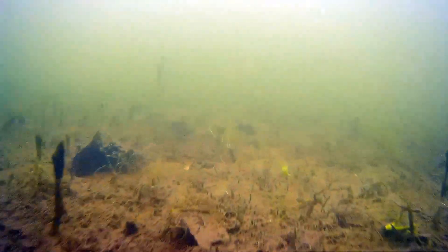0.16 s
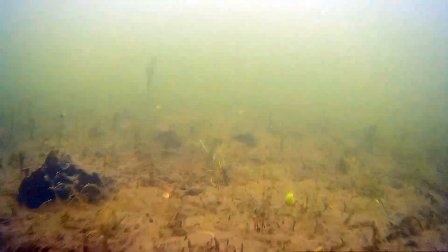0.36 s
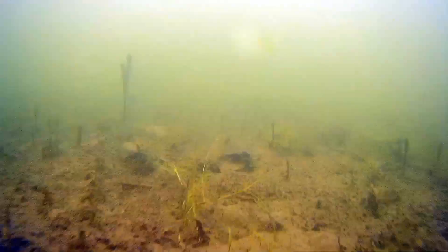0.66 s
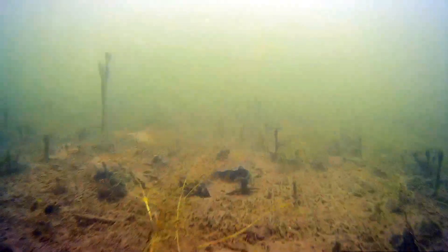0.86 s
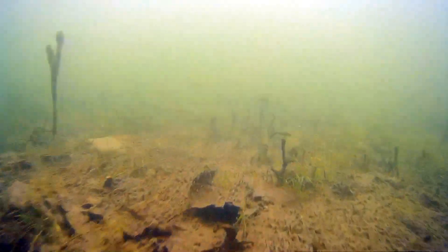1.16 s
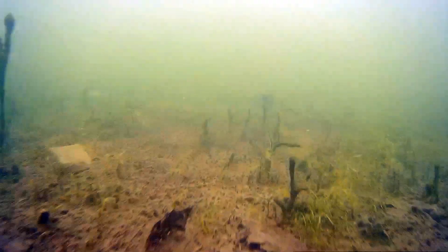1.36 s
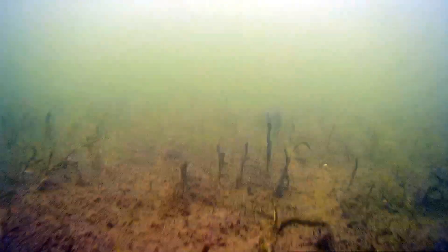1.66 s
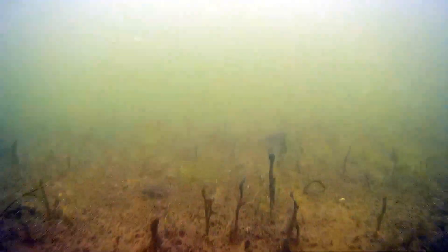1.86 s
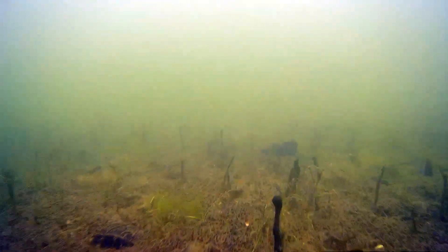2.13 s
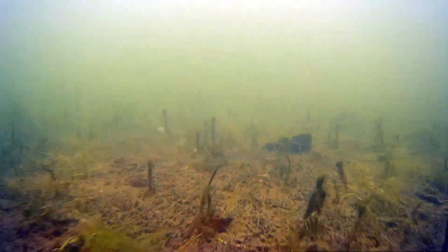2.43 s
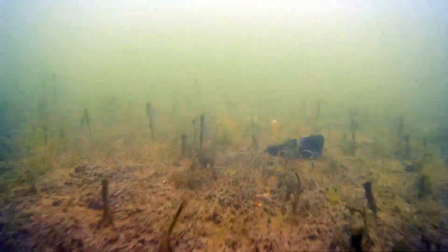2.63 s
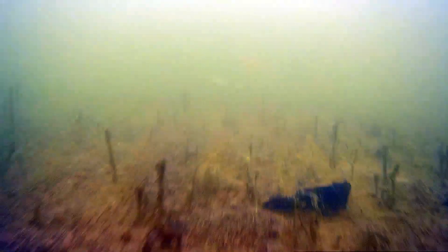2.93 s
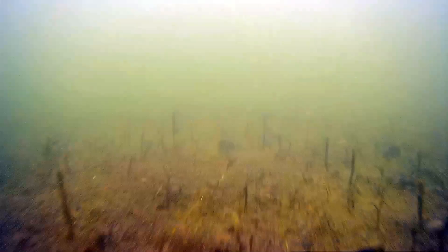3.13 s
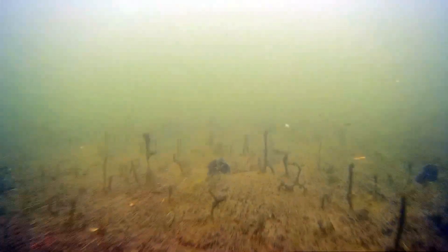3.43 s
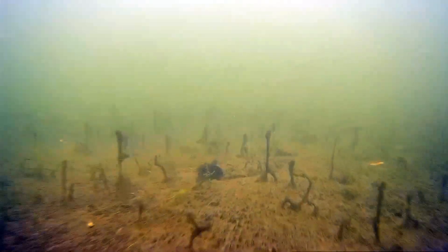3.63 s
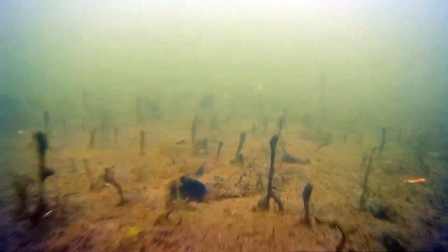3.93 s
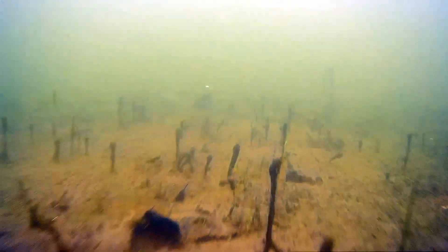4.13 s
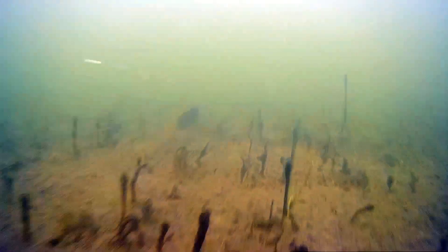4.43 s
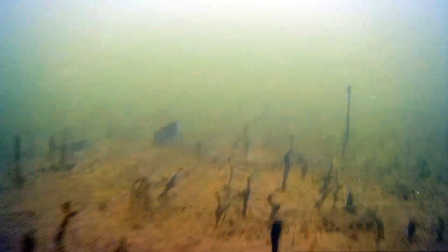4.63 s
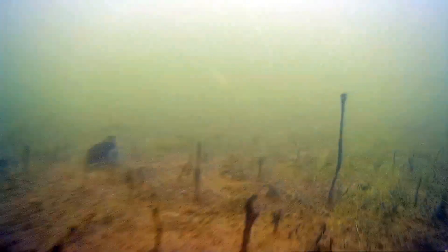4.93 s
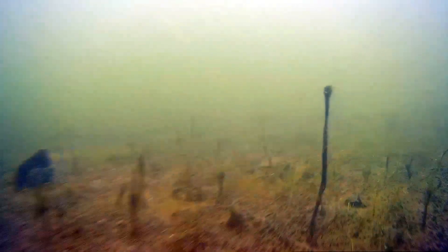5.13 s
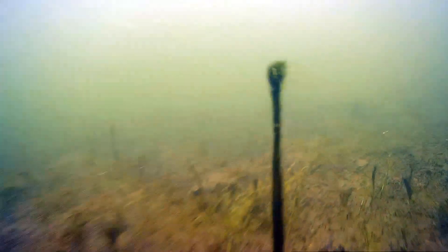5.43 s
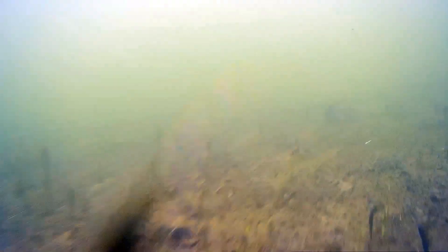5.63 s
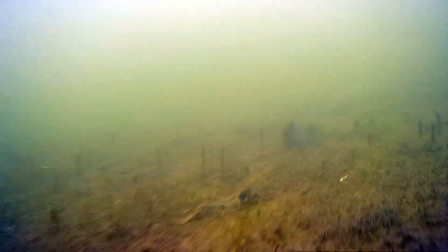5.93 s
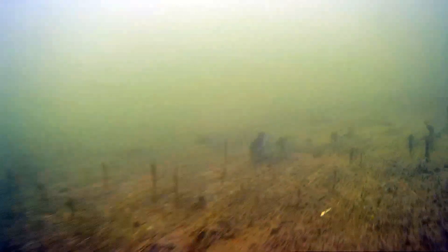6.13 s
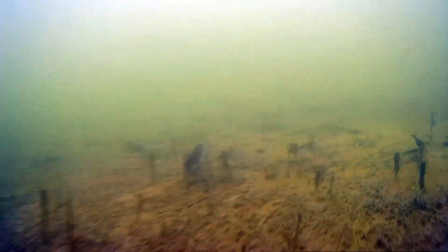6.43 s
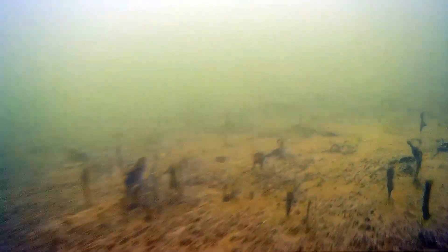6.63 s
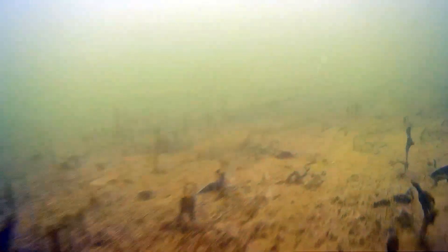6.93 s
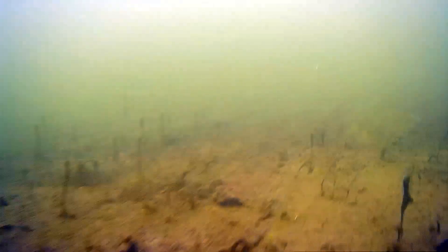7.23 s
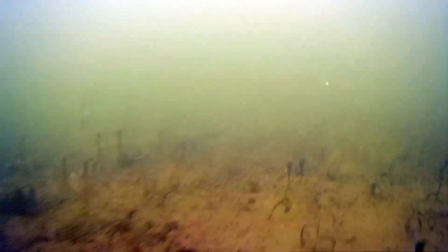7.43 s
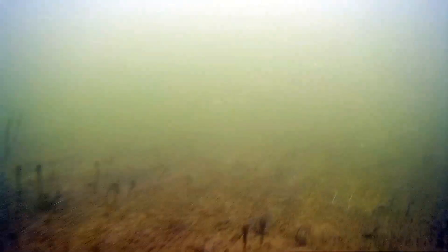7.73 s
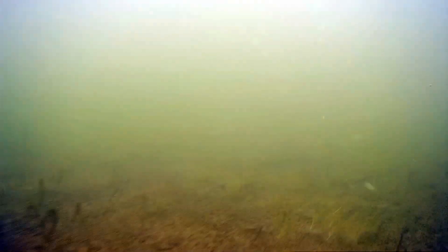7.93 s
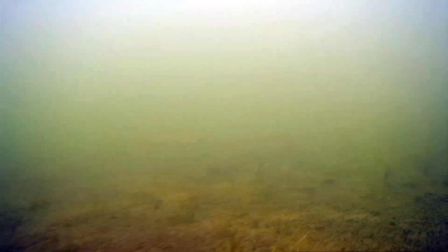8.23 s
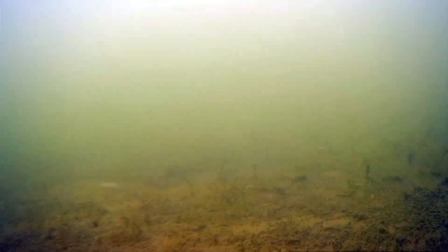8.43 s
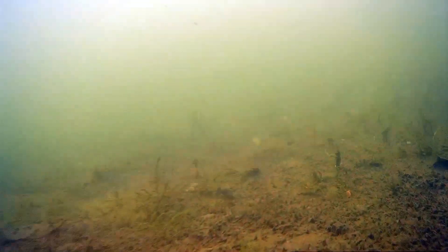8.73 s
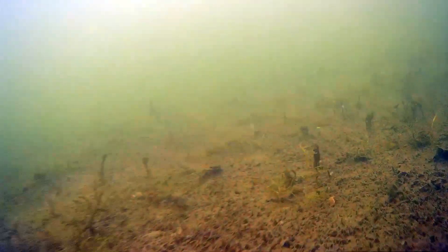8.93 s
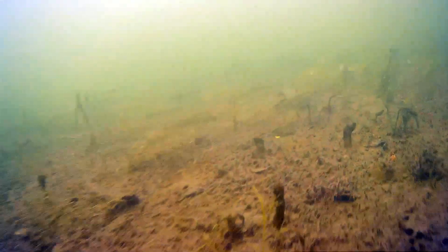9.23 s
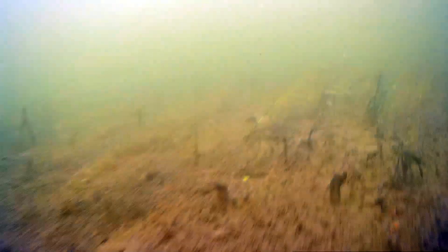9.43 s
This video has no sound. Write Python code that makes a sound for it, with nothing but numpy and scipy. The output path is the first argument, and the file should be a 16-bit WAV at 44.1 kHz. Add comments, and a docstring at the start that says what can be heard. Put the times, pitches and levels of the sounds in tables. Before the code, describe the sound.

A small electric motor hums and whines steadily underwater, heard through a hull, stepping down and up in pitch, with a few brief gritty scuffs late on.

```python
"""Model submarine under way

A model submarine cruises over a lake bed, heard through its own hull. A three-pole motor drives a three-bladed
propeller through 9:30 gears: sines locked to the shaft give hum, whine and a throb where blade and shaft tones beat.
Filtered noise gives a pulsing hiss of teeth and brushes and a low wash. The speed steps down and up in throttle
notches; at its lowest, short noise bursts scuff along the hull."""
import sys
import numpy as np
from scipy import signal
from scipy.fft import rfft, irfft, next_fast_len
from scipy.io import wavfile

SR = 44100
rng = np.random.default_rng(int(sys.argv[2]) if len(sys.argv) > 2 else 0)


def wav_record(signal):
    """Record a signal, one row per channel, as 16-bit PCM in the file named by sys.argv[1]."""
    frames = np.transpose(np.atleast_2d(signal))
    bounded = np.clip(frames, -1, 1)
    # unit amplitude maps onto the largest positive 16-bit level
    quanta = np.round(bounded * 32767).astype(np.int16)
    wavfile.write(sys.argv[1], SR, quanta)


N = 422037
TIME = np.arange(N) / SR  # s

FREE_HZ, LABOURING_HZ = 183.64, 151  # motor turns per second that set load 0 and load 1
PINION_TEETH, WHEEL_TEETH, BLADES, POLES = 9, 30, 3, 3
PROP_RATIO = PINION_TEETH / WHEEL_TEETH  # propeller turns per motor turn

# Throttle moves in equal notches: start_s, glide_s, notches_below_full after the move
THROTTLE_MOVES = [(.68, .08, 2), (1.02, .12, 1), (1.32, .09, 0), (2.04, .09, 1), (3.56, .09, 2),
                  (3.84, .22, 0), (5.59, .18, 3), (6.03, .09, 2), (6.51, .23, 3), (6.91, .21, 6),
                  (7.75, .15, 3), (7.96, .25, 1), (8.54, .08, 2), (8.89, .14, 0), (9.29, .22, 3)]
FIRST_NOTCH, NOTCH_HZ = 1, 5.27
SAG_HZ_PER_S = .103
# The scuffs brake the motor a little further
BRAKE_AT_S, BRAKE_WIDTH_S, BRAKE_HZ = 7.45, .1, 1.2

# Hull response to each leading tone at its pitch of the moment, before swells: pitch_hz, rms_level_db
BLADE_RESPONSE = [(138, -45), (150, -59), (155, -50.6), (160, -46.5), (165, -41)]
HUM_RESPONSE = [(303, -40.5), (318, -32), (334, -32.5), (356, -33.5), (366, -34)]
POLE_RESPONSE = [(455, -46.5), (501, -43), (534, -38.5), (549, -36)]
WHINE_RESPONSE = [(2720, -44), (2830, -51), (2950, -42), (3020, -48), (3100, -46.5), (3190, -39),
                  (3300, -49)]
# Slow swells added to the hum, the pole tone and the whine: time_s, change_db
HUM_SWELL = [(0, -.5), (2.4, -0.9), (5.6, -3), (6.7, 1.8), (9.57, .7)]
POLE_SWELL = [(0, -0.5), (1.2, -1.2), (2.35, 5), (2.9, -4), (3.8, 2), (4.35, -4), (5.4, 2.2), (7, -3),
              (9.57, -4.5)]
WHINE_SWELL = [(0, 0.5), (2.5, 2), (2.85, -6.5), (3.35, -0.5), (4.8, 4), (6.05, -6), (6.45, 0), (8.3, -0.5),
               (9.57, 2)]

# Lesser tones before hull and gain: multiple_of_motor_speed (before rounding to tenths), free_db, labouring_db
LESSER_PARTIALS = [(0.3, -55, -58.5), (1, -53, -52.5), (1.5, -61, -78), (1.8, -51, -56), (1.9, -55, -52.5),
                   (2.1, -61, -53.5), (2.4, -52.5, -48), (2.7, -62.5, -54), (3.3, -62.5, -56.5),
                   (3.6, -53, -52.5), (3.9, -56, -53), (4, -73, -49.5), (4.8, -53.5, -69.5), (5, -66, -54),
                   (6, -56, -52.5), (6.99, -54, -66), (8.34, -64, -70), (8.66, -60, -76),
                   (8.997, -57.5, -61), (9.6, -59, -89.5), (9.99, -56, -59.5), (12, -56.5, -51.5),
                   (15, -61, -51.5), (17.39, -51.5, -77), (17.66, -55.5, -55), (19.5, -60, -73.5),
                   (20.53, -53, -88.5), (20.96, -69.5, -46.5), (24.01, -58, -51), (27.03, -53, -63.5),
                   (29.5, -71, -67), (32.9, -62.5, -56.5), (35.92, -56, -51.5), (36.5, -60, -74.5),
                   (50.4, -78.5, -52.5), (53.9, -67.5, -44.5)]
# Hull resonances that lift a passing tone: centre_hz, width_hz, lift_db
HULL_PEAKS = [(168.3, 27.6, 14), (326, 37, 11), (1075, 63, 8.5), (1537, 86, 10.5), (4390, 150, 10),
              (5496, 110, 12), (6600, 260, 15)]
# Hull antiresonances, where little passes: centre_hz, width_hz, dip_db (negative)
HULL_DIPS = [(985, 60, -6.5), (1134, 59, -15.5), (2114, 62, -16.5), (2600, 210, -7.5), (3360, 153, -14),
             (3864, 47, -10), (4210, 71, -15), (4560, 83, -7.5), (5560, 120, -8), (5920, 245, -21.5),
             (6480, 120, -9), (8030, 310, -21.5), (8610, 160, -15)]

# Friction of teeth and brushes, before hull and rubbing: frequency_hz, density_db_per_hz
HISS_SPECTRUM = [(850, -93.5), (1230, -74), (1400, -77.5), (1560, -76), (1900, -74), (2450, -80),
                 (3050, -74), (3750, -73.5), (5400, -76), (6200, -78), (6800, -74.5), (7450, -71.5),
                 (8100, -73), (9300, -87.5)]
# How hard teeth and brushes rub: time_s, change_db
FRICTION_LEVEL = [(0, .5), (1.0, 1.5), (1.7, -1), (2.2, 1.5), (2.9, -0.6), (3.85, 1.3), (4.4, -0.45),
                  (6.4, 1.04), (9.57, 0.5)]
# Rubbing eases as the motor coasts down: memory, and dB per turn per second lost
COAST_S, COAST_DB_PER_HZ = 0.13, 0.17
# The boat drags for a moment around the scuffs, which raises hiss and wash
DRAG_AT_S, DRAG_WIDTH_S, DRAG_HISS_DB, DRAG_WASH_DB = 7.62, .17, 3, 4.5

# Churned water and hull rumble, before treble loss and churn: frequency_hz, density_db_per_hz
WASH_SPECTRUM = [(20, -78), (40, -81.5), (70, -80.5), (88, -70), (115, -80.5), (220, -73), (270, -79.5),
                 (330, -63), (410, -75.5), (560, -67.5), (740, -77.5), (980, -84.5)]
# How hard the propeller churns the water: time_s, change_db
CHURN_LEVEL = [(0, -1.2), (1.5, -2), (2.3, 0.5), (4.45, -3), (5.9, -2), (8.2, -1.5), (9.57, -4.5)]

# Scuffs along the hull: centre_s, bell_width_s, centre_hz, peak_level_db
HULL_SCUFFS = [(7.403, 0.007, 3600, -35.5), (7.417, .0015, 6000, -27), (7.422, 0.0082, 4370, -34.5),
               (7.452, 0.0036, 4500, -36.5), (7.471, 0.013, 5170, -34)]
# Dull bumps of the boat, then a short gurgle of water: centre_s, bell_width_s, centre_hz, peak_level_db
BUMPS_AND_GURGLE = [(7.434, 0.017, 90, -50), (7.49, .016, 80, -45.5), (7.82, 0.0089, 337, -38)]

CUTOFF_HZ = 9350


def from_db(db):
    """Logarithmic level: decibels become an amplitude gain."""
    return 10 ** (np.asarray(db) / 20)


def rms_one(x):
    """Normalisation: a signal is scaled to unit mean power."""
    return x / np.sqrt(np.mean(x ** 2) + 1e-20)


def in_time(rows):
    """Linear interpolation: straight lines join (time, value) rows."""
    return np.interp(TIME, *np.transpose(rows))


def bell(centre_s, width_s):
    """Gaussian envelope: a smooth swell of height 1, its width one standard deviation."""
    return np.exp(-((TIME - centre_s) / width_s) ** 2 / 2)


def at_hz(points, hz):
    """Spectral interpolation: levels are joined on a logarithmic frequency axis."""
    freqs, level_db = np.transpose(points)
    return np.interp(np.log(hz), np.log(freqs), level_db)


def resonances_db(modes, hz):
    """Modal response: each mode lifts or dips the level in a bell of the given width about its centre."""
    return sum(peak_db / (1 + (2 * (hz - centre) / width) ** 2) for centre, width, peak_db in modes)


def drift(rate_hz):
    """Low-passed chance: a double pole at rate_hz leaves slow fluctuations of about unit rms."""
    step = 40  # samples between computed values
    settling = 2000
    pole = np.exp(-2 * np.pi * rate_hz * step / SR)
    noise = rng.standard_normal(N // step + settling + 2)
    slow = signal.lfilter([1], [1, -2 * pole, pole * pole], noise)[settling:]
    return np.interp(np.arange(N) / step, np.arange(len(slow)), rms_one(slow))


def coloured(x, colour_db):
    """Spectral shaping: unit white noise takes a density of colour_db(Hz) dB per Hz."""
    size = next_fast_len(N)
    hz = np.maximum(np.arange(size // 2 + 1) * SR / size, 1)
    shaped = rfft(x, size) * from_db(colour_db(hz))
    return irfft(shaped, size)[:N] * np.sqrt(SR / 2)


def band(x, low_hz, high_hz):
    """Band-pass filtering: only frequencies between two edges pass freely."""
    edges = [low_hz, min(high_hz, SR / 2 - 1)]
    return signal.sosfilt(signal.butter(2, edges, "band", fs=SR, output="sos"), x)


def bursts(source, rows, spread):
    """Enveloped noise: bell-shaped bursts, each in a band from centre / spread to centre * spread."""
    out = np.zeros(N)
    for centre_s, width_s, hz, level_db in rows:
        noise = rms_one(band(source, hz / spread, hz * spread))
        out += from_db(level_db) * bell(centre_s, width_s) * noise
    return out


def tone(angle, multiple, level_db):
    """Phase locking: a sine follows a multiple of the motor shaft angle, at an rms level."""
    return np.sqrt(2) * from_db(level_db) * np.sin(multiple * angle + rng.uniform(0, 2 * np.pi))


def motor_speed():
    """Throttled rotation: turns per second glide from notch to notch, sag slowly and dip under the brake."""
    start_s, glide_s, notches = np.transpose(THROTTLE_MOVES)
    steps = np.diff(notches, prepend=FIRST_NOTCH)
    notch = np.full(N, float(FIRST_NOTCH))
    for start, glide, step in zip(start_s, glide_s, steps):
        notch += step * np.clip((TIME - start) / glide, 0, 1)
    braking = BRAKE_HZ * bell(BRAKE_AT_S, BRAKE_WIDTH_S)
    return FREE_HZ - NOTCH_HZ * notch - SAG_HZ_PER_S * TIME - braking


def shaft_angle(speed, load, wobble_hz, labouring_wobble_hz):
    """Integrated rotation: speed sums to angle, with an unsteadiness that grows as the motor labours."""
    wobble = (wobble_hz + labouring_wobble_hz * load) * drift(12.96)
    return 2 * np.pi * np.cumsum(speed + wobble) / SR


def leading_tones(angle, speed, hum_waver_db):
    """Forced vibration: blade, twice-a-turn and pole tones follow the hull; blade and shaft tones beat."""
    passing = BLADES * PROP_RATIO  # blades passing per motor turn
    blade_db = at_hz(BLADE_RESPONSE, passing * speed)
    hum_db = at_hz(HUM_RESPONSE, 2 * speed) + in_time(HUM_SWELL)
    pole_db = at_hz(POLE_RESPONSE, POLES * speed) + in_time(POLE_SWELL)
    blades = tone(angle, passing, blade_db + hum_waver_db * drift(23))
    hum = tone(angle, 2, hum_db + hum_waver_db * drift(9.6))
    poles = tone(angle, POLES, pole_db + hum_waver_db * drift(26))
    return blades + hum + poles


def lesser_tones(angle, speed, load, rub_db, waver_db, flutter_db, gain_db):
    """Swept resonance: harmonics and sidebands of both shafts swell and fade as they slide over hull modes."""
    out = np.zeros(N)
    coarse = slice(None, None, 100)
    for multiple, free_db, labouring_db in LESSER_PARTIALS:
        multiple = np.round(multiple * 10) / 10  # the gear pattern repeats every ten motor turns
        drive_db = free_db + load * (labouring_db - free_db)
        coarse_hull_db = resonances_db(HULL_PEAKS + HULL_DIPS, multiple * speed[coarse])
        hull_db = np.interp(TIME, TIME[coarse], coarse_hull_db)
        if multiple < PINION_TEETH:
            unsteady_db = waver_db * drift(1.9)
        else:  # tooth tones follow the rubbing and flutter faster
            unsteady_db = rub_db + flutter_db * drift(20)
        out += tone(angle, multiple, gain_db + drive_db + hull_db + unsteady_db)
    return out


def gear_whine(angle, speed, waver_db, wander_db, runout, skirt_db, rattle_hz):
    """Mesh excitation: an off-centre wheel pulses the whine; teeth rattling in their play add a rough skirt."""
    mesh = 2 * PINION_TEETH  # second harmonic of tooth contact
    level_db = at_hz(WHINE_RESPONSE, mesh * speed) + in_time(WHINE_SWELL)
    level_db += waver_db * drift(21) + wander_db * drift(2.1)
    line = tone(angle, mesh, level_db) * (1 + runout * np.cos(PROP_RATIO * angle))
    skirt = drift(rattle_hz) * np.sin(mesh * angle) + drift(rattle_hz) * np.cos(mesh * angle)
    return line + from_db(skirt_db) * skirt


def friction_db(speed):
    """Coasting friction: rubbing eases while speed falls below its recent value and swells in the drag."""
    memory = np.exp(-1 / (COAST_S * SR))
    recent = speed[0] + signal.lfilter([1 - memory], [1, -memory], speed - speed[0])
    coasting_db = COAST_DB_PER_HZ * np.maximum(recent - speed, 0)
    return in_time(FRICTION_LEVEL) + DRAG_HISS_DB * bell(DRAG_AT_S, DRAG_WIDTH_S) - coasting_db


def gear_hiss(angle, load, pole_depth, prop_depth, turn_depth, grain_db, peak_share, dulling_db, dull_hz):
    """Modulated friction noise: it pulses with poles and both shafts; its top fades as the motor slows."""
    pulsing = 1 + pole_depth * np.cos(POLES * angle)
    pulsing *= 1 + prop_depth * np.cos(PROP_RATIO * angle)
    pulsing *= 1 + turn_depth * np.cos(angle)
    friction = rms_one(rng.standard_normal(N) * pulsing * from_db(grain_db * drift(110)))

    def free_db(hz):
        """Hull transmission: modes colour the friction spectrum."""
        hull_db = peak_share * resonances_db(HULL_PEAKS, hz) + resonances_db(HULL_DIPS, hz)
        return at_hz(HISS_SPECTRUM, hz) + hull_db

    def slowed_db(hz):
        """Treble loss: the slowed spectrum falls towards dulling_db above dull_hz."""
        return free_db(hz) + dulling_db * hz ** 2 / (hz ** 2 + dull_hz ** 2)

    free = coloured(friction, free_db)
    slowed = coloured(friction, slowed_db)
    return free + load ** 2 * (slowed - free)


def wash():
    """Turbulence noise: the propeller churns low-frequency noise, with the treble steeply reduced."""
    def colour_db(hz):
        """Low-pass slope: the density falls steeply above 1500 Hz."""
        return at_hz(WASH_SPECTRUM, hz) - 20 * np.log10(1 + (hz / 1500) ** 4)

    noise = coloured(rng.standard_normal(N), colour_db)
    return noise * from_db(in_time(CHURN_LEVEL) + DRAG_WASH_DB * bell(DRAG_AT_S, DRAG_WIDTH_S))


def scuffing(grains_per_s):
    """Random impacts: grains of grit rub on the shell, the boat bumps dully, then water gurgles briefly."""
    grit = rng.standard_normal(N) * (rng.random(N) < grains_per_s / SR)
    scuffs = bursts(grit, HULL_SCUFFS, spread=1.53)
    bumps_and_gurgle = bursts(rng.standard_normal(N), BUMPS_AND_GURGLE, spread=1.36)
    return scuffs + bumps_and_gurgle


def scene():
    """Common drive: one shaft speed governs every tone and the hiss; wash and scuffs are added."""
    speed = motor_speed()
    load = np.clip((FREE_HZ - speed) / (FREE_HZ - LABOURING_HZ), 0, 1)
    rub_db = friction_db(speed)
    angle = shaft_angle(speed, load, wobble_hz=0.0804, labouring_wobble_hz=.25)
    tones = leading_tones(angle, speed, hum_waver_db=0.26)
    tones += lesser_tones(angle, speed, load, rub_db, waver_db=1.17, flutter_db=2.5, gain_db=-0.77)
    whine = gear_whine(angle, speed, waver_db=0.75, wander_db=1.8, runout=0.11, skirt_db=-57.5, rattle_hz=70.6)
    hiss = gear_hiss(angle, load, pole_depth=0.19, prop_depth=0.082, turn_depth=0.073, grain_db=1.0,
                     peak_share=0.33, dulling_db=-9.0, dull_hz=5000)
    mix = tones + whine + hiss * from_db(rub_db) + wash() + scuffing(grains_per_s=7000)
    return mix[None]


def record(dry):
    """Band limiting: a steep elliptic low-pass cuts the top."""
    return signal.sosfilt(signal.ellip(12, .1, 90, CUTOFF_HZ, fs=SR, output="sos"), dry)


dry = scene()
out = record(dry)
wav_record(out)
```